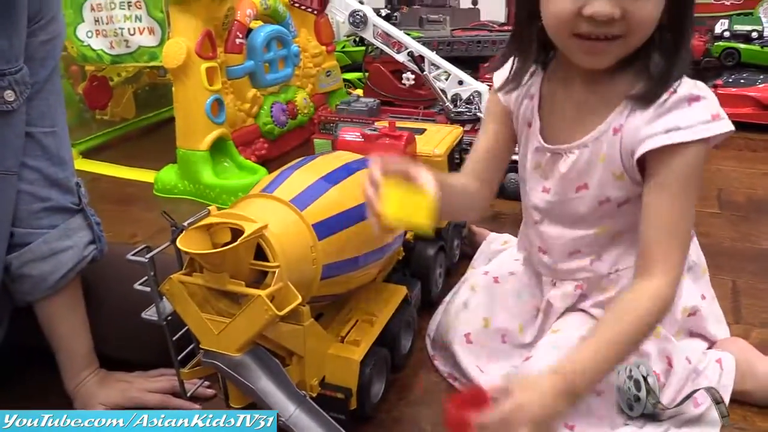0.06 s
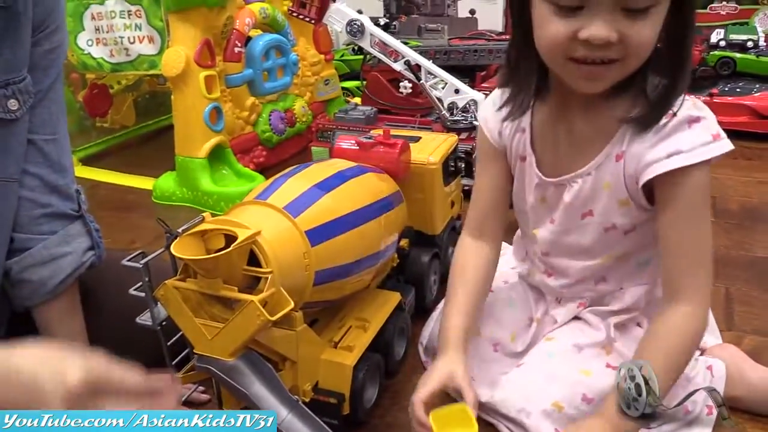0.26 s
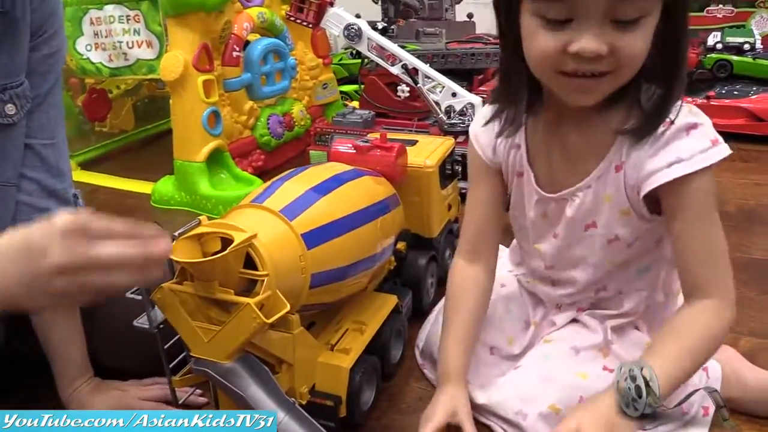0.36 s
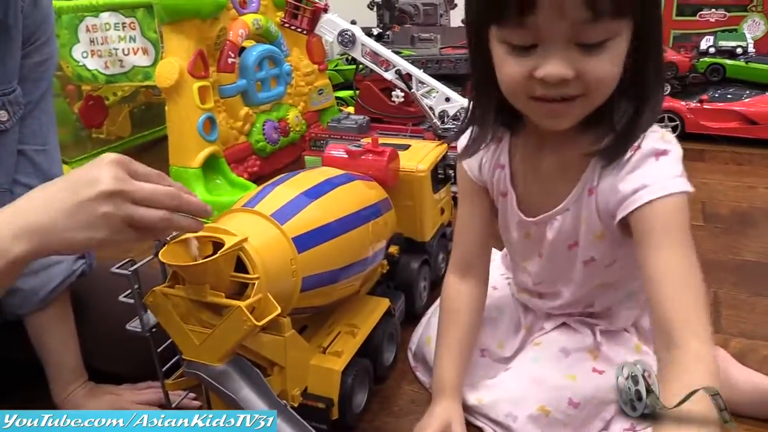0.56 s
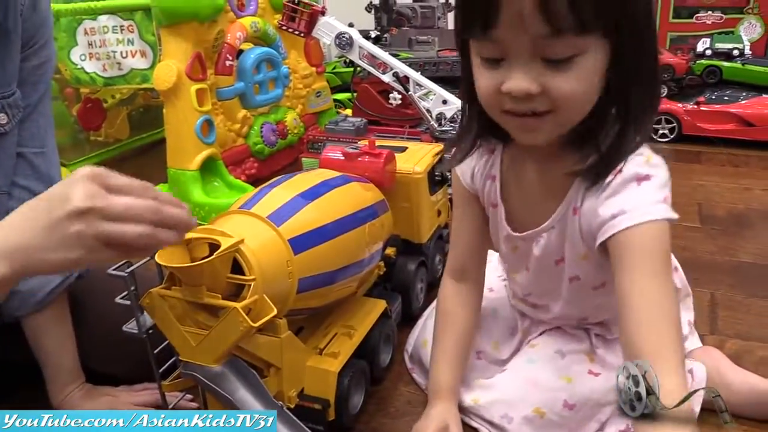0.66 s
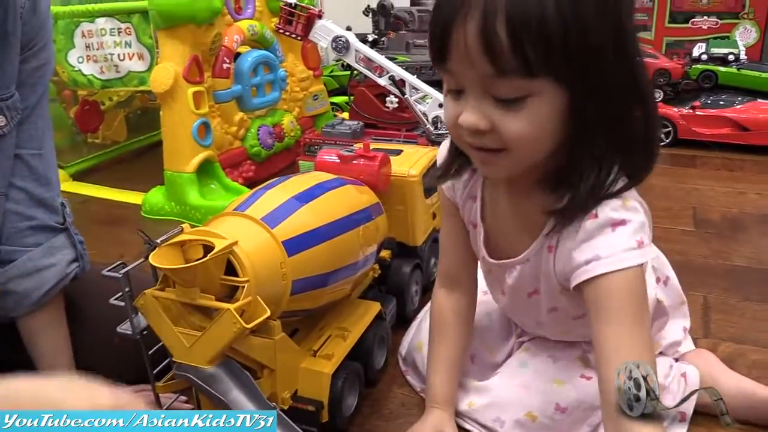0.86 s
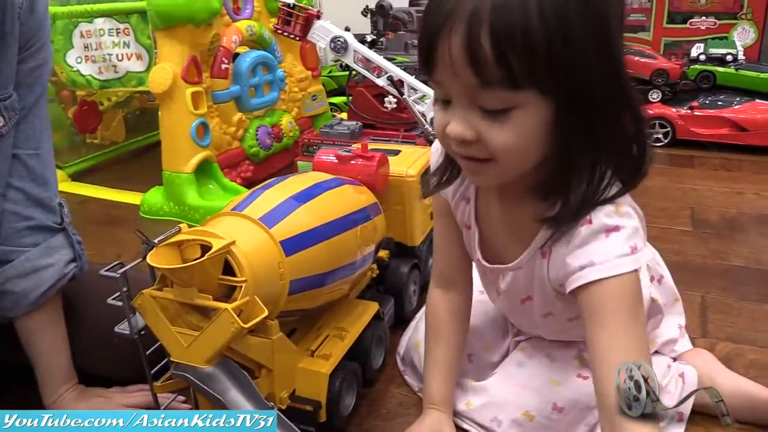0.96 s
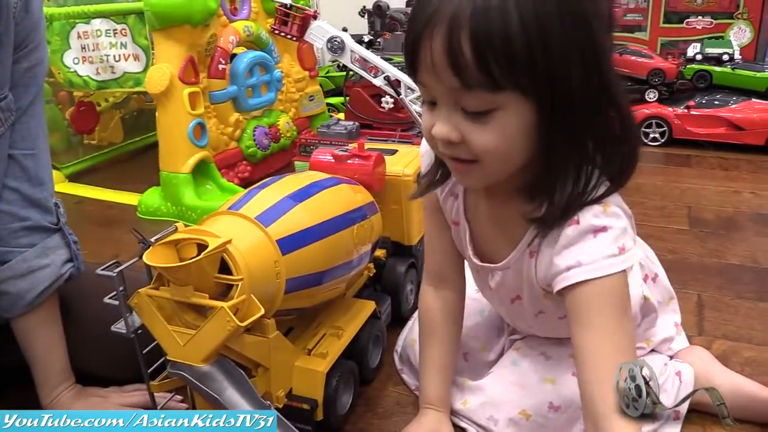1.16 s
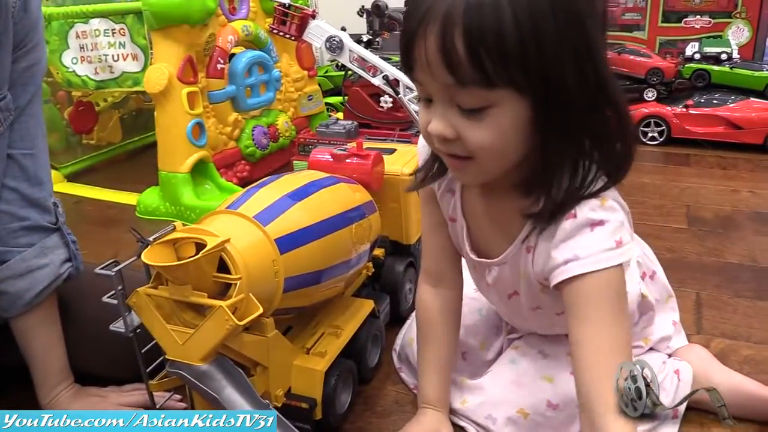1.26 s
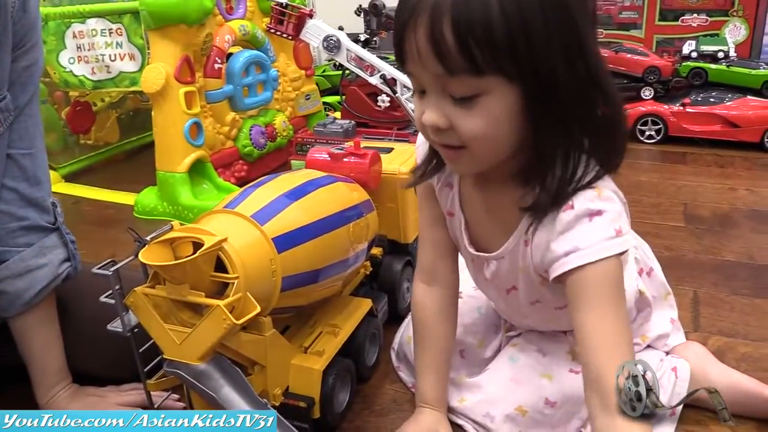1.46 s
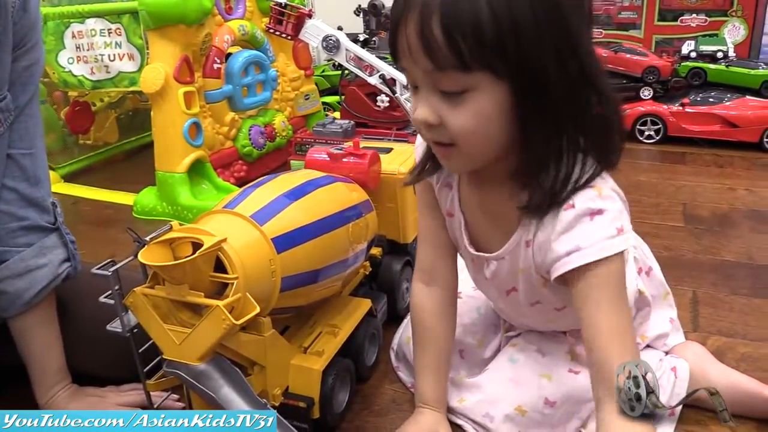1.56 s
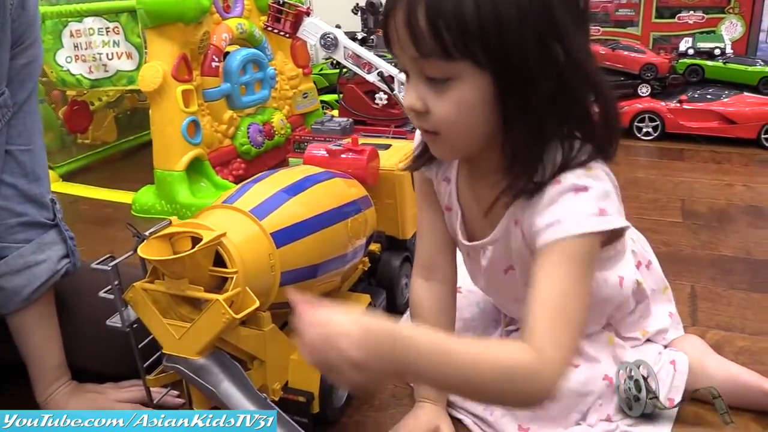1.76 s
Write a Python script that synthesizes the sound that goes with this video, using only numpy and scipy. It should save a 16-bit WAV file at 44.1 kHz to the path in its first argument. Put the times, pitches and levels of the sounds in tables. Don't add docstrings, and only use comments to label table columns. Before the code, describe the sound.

Hard plastic toy clatter in a bare, live room. An earlier knock's tail fades, then a cup cracks onto wood at 0.23 s, rocks rapidly and bounces at 0.46. Pellets tick from 0.67, hollow drum knocks follow at 0.8-0.95, and bright rattling runs down a chute at 1.0-1.3. A part lands at 1.4, wobbles, settles at 1.57; faint ticks near 1.73. Low hush, squashed peaks.

```python
import sys
import numpy as np
from scipy import signal
from scipy.fft import rfft, irfft
from scipy.io import wavfile

SR = 44100
rng = np.random.default_rng(int(sys.argv[2]) if len(sys.argv) > 2 else 0)


def generate_wav(sig):
    pcm = np.round(np.clip(np.atleast_2d(sig).T, -1, 1) * 32767).astype(np.int16)
    wavfile.write(sys.argv[1], SR, pcm)


def gain_from_decibels(decibels):
    exponent = np.asarray(decibels, float) / 20
    return 10 ** exponent


N = 79380

# (time [s], peak level [dB], own ring [Hz], room send [dB])
EARLIER_KNOCKS = [
    (-0.21, -6, 2290, 2),
]
# (time [s], peak level [dB], own ring [Hz], room send [dB])
CUP_DROP_KNOCKS = [
    (.2273, 3, 2130, 6),
    (.2353, 6.2, 3680, -4.5),
]
# (time [s], peak level [dB], own ring [Hz], room send [dB])
CUP_ROCKING_KNOCKS = [
    (.262, -5, 2030, 4),
    (.293, 3, 2040, -3.5),
    (.314, -1, 2080, -15),
    (.3255, -2, 1970, 1),
    (.338, -10, 2220, 6),
    (.357, -3, 2080, -2.5),
    (.368, -14, 2500, -2),
]
# (time [s], peak level [dB], own ring [Hz], room send [dB])
CUP_BOUNCE_KNOCKS = [
    (0.4549, 0, 2360, 0.77),
    (0.4584, -7.5, 2200, 0.65),
]
# (time [s], peak level [dB], own ring [Hz], room send [dB])
PELLET_KNOCKS = [
    (.6653, 1, 7400, 2.5),
    (.6782, 0, 7570, -3.5),
    (.6995, -11, 8030, 10.5),
    (.7057, -6, 7700, -12),
    (.7235, -25, 7700, -6),
    (1.0605, -12.5, 9530, -4),
]
# (time [s], peak level [dB], own ring [Hz], room send [dB])
DEEP_PELLET_KNOCKS = [
    (.7057, -6, 3240, 0),
    (.7272, 3, 2900, -8),
    (.7335, -1.5, 2780, -16),
]
# (time [s], peak level [dB], own ring [Hz], room send [dB])
DRUM_KNOCKS = [
    (.8025, 2.5, 3400, 1.5),
    (.8199, -4, 1920, 4),
    (.8572, 4, 2200, 0),
    (.8788, -9, 2300, -41),
    (.8905, -0.5, 2470, 0),
    (.9285, 4, 2900, -6),
]
# (time [s], peak level [dB], own ring [Hz], room send [dB])
TUMBLE_KNOCKS = [
    (.8045, -6.5, 3700, -8),
    (.8225, -1, 3230, -10),
    (.8545, -21, 2900, -19),
    (.876, -7.5, 2500, -5),
    (.8825, -11, 3400, -16),
    (.9245, -23, 2500, -12),
    (.949, -15, 2250, 0),
]
# (time [s], peak level [dB], own ring [Hz], room send [dB])
RATTLE_KNOCKS = [(.8235, -19, 6300, -4), (.859, -26, 7140, -1), (.881, -16.5, 6100, 8),
                 (.921, -18, 6100, 4), (.931, -21, 6200, 6.5), (1.063, -15, 6500, 6),
                 (1.076, -24, 8700, -8), (1.092, -12, 4800, 3.5), (1.112, -13.5, 6370, -3),
                 (1.1225, -14, 7000, -3), (1.138, -15, 8400, -4), (1.153, -14, 6600, -2),
                 (1.176, -14.5, 7900, -3.5), (1.190, -14, 8350, -12), (1.234, -18.5, 5600, -3),
                 (1.288, -23, 8700, -3)]
# (time [s], peak level [dB], own ring [Hz], room send [dB])
CHUTE_KNOCKS = [
    (1.0145, -10, 2650, 7),
    (1.0748, -2, 1850, 0),
    (1.0913, 0.5, 2800, 2),
    (1.109, -11, 3160, -1),
    (1.1215, 4, 2630, -27),
    (1.138, -12, 2230, 7.5),
    (1.1525, -13.5, 2900, 8),
    (1.1885, -6.5, 2900, -6),
    (1.2315, -5.5, 2710, -0.5),
    (1.287, -12, 2760, 2.5),
]
# (time [s], peak level [dB], own ring [Hz], room send [dB])
SET_DOWN_KNOCKS = [
    (1.3995, -1.5, 2093, -3),
    (1.4065, -6.5, 3050, -2),
]
# (time [s], peak level [dB], own ring [Hz], room send [dB])
WOBBLE_KNOCKS = [
    (1.4125, -12, 2700, 0.5),
    (1.421, -14, 3050, -3),
    (1.4432, -15.5, 2160, -2),
    (1.468, -17, 3050, -3),
    (1.515, -20.5, 2170, 1.5),
    (1.5345, -31, 2150, -1),
]
# (time [s], peak level [dB], own ring [Hz], room send [dB])
SETTLE_KNOCKS = [
    (1.5727, -15.5, 1810, -1.9),
]
# (time [s], peak level [dB], own ring [Hz], room send [dB])
LAST_TICK_KNOCKS = [
    (1.7206, -21, 2900, 0),
    (1.7381, -20, 2800, -29),
]
# (time [s], peak level [dB], board ring [Hz])
BOARD_THUMPS = [
    (.228, -13, 254),
    (0.457, -17.5, 221),
    (0.803, -25.5, 308),
    (1.02, -31.5, 246),
    (1.301, -35, 310),
    (1.391, -19, 280),
    (1.407, -21, 137),
    (1.575, -25.5, 216),
]

# (frequency [Hz], level [dB])
EARLIER_COLOUR = [(150, -10), (400, -11), (1900, -14), (4000, -13), (12000, -34), (16400, -74)]
# (frequency [Hz], level [dB])
CUP_COLOUR = [(70, -28.5), (150, -15.5), (700, -16.5), (1500, -10.5), (2200, -6), (3300, -10.5),
              (4700, -25.5), (7600, -23.5), (12500, -46), (16400, -100)]
# (frequency [Hz], level [dB])
BOUNCE_COLOUR = [(59, -81), (100, -34), (424, -24), (1650, -21), (2170, -14), (9210, -48.5), (13500, -44),
                 (16000, -101)]
# (frequency [Hz], level [dB])
PELLET_COLOUR = [(240, -56), (400, -24), (897, -9.5), (1700, -7.5), (2540, -4), (3860, -15.5), (7640, -4.5),
                 (13000, -22.5), (16400, -33)]
# (frequency [Hz], level [dB])
DEEP_PELLET_COLOUR = [(500, -43), (1000, -19), (1600, -14.5), (2900, -1.5), (4000, -20), (8500, -26),
                      (16000, -55)]
# (frequency [Hz], level [dB])
DRUM_COLOUR = [(150, -57), (504, -31), (637, -25), (854, -13.5), (1660, -11.5), (2180, 0), (4500, -16.5),
               (8560, -23), (16000, -37)]
# (frequency [Hz], level [dB])
RATTLE_COLOUR = [(2500, -46), (4500, -5), (7000, 3.5), (10000, -6.5), (13000, -26), (16400, -38)]
# (frequency [Hz], level [dB])
CHUTE_COLOUR = [(180, -64), (300, -40), (379, -37.5), (856, -17), (2790, -6.5), (4090, -18), (8500, -30.5),
                (16000, -63)]
# (frequency [Hz], level [dB])
SET_DOWN_COLOUR = [(80, -16), (1550, -5.5), (1760, -4), (2220, -3.5), (2580, -8.5), (3300, -9), (4500, -24),
                   (16000, -68)]
# (frequency [Hz], level [dB])
SETTLE_COLOUR = [(300, -21.5), (800, -1.5), (2000, -7.5), (3200, -11), (4500, -26), (16000, -90)]
# (frequency [Hz], level [dB])
LAST_TICK_COLOUR = [(710, -58), (1200, -22), (2860, -9.5), (4080, -28.5), (8910, -26.5), (16000, -87)]

# (frequency [Hz], level [dB], T60 [s])
CUP_RINGS = [(823, -11, 0.02), (2080, -13, 0.05), (2390, -5, 0.032), (3700, -4, 0.076), (5140, -30, 0.03),
             (7100, -15, .02)]
# (frequency [Hz], level [dB], T60 [s])
ROCKING_RINGS = [(2080, 1.5, 0.027), (2410, -11, 0.018), (2550, -23, .03), (5400, -7.5, 0.031),
                 (7400, -7, .015)]
# (frequency [Hz], level [dB], T60 [s])
BOUNCE_RINGS = [(1090, -19.5, 0.039), (2114, 8, 0.017), (2700, -1.5, 0.035), (8950, -49, 0.0055)]
# (frequency [Hz], level [dB], T60 [s])
PELLET_RINGS = [(993, -5.5, 0.084), (2650, -7, .03), (8000, -3, 0.0058), (9400, -32, 0.014)]
# (frequency [Hz], level [dB], T60 [s])
DEEP_PELLET_RINGS = [(975, -9, 0.04), (1640, -10, 0.0395), (2650, -20, .03), (3220, -20, 0.04)]
# (frequency [Hz], level [dB], T60 [s])
DRUM_RINGS = [(810, -24, 0.048), (880, -7, 0.04), (1920, -15, 0.12), (2160, -6.5, 0.087),
              (2950, 7.5, 0.017), (3400, -32, 0.027)]
# (frequency [Hz], level [dB], T60 [s])
TUMBLE_RINGS = [(848.5, 3.5, 0.061), (3400, -14, .02), (2500, -9, 0.016)]
# (frequency [Hz], level [dB], T60 [s])
RATTLE_RINGS = [(6560, -18, .01), (8700, -2, 0.014)]
# (frequency [Hz], level [dB], T60 [s])
CHUTE_RINGS = [(1710, -49, 0.036), (1850, 4.5, 0.026), (2360, -7, 0.075), (2820, -29, 0.046),
               (4830, -42, 0.015), (8450, -7, 0.034)]
# (frequency [Hz], level [dB], T60 [s])
SET_DOWN_RINGS = [(1640, -14, 0.056), (2150, -1, 0.025), (3050, 2, 0.052), (3280, -12, 0.034)]
# (frequency [Hz], level [dB], T60 [s])
WOBBLE_RINGS = [(1530, -12, 0.023), (2710, -14, 0.031), (3050, -8, 0.034), (3520, -4, 0.042)]
# (frequency [Hz], level [dB], T60 [s])
SETTLE_RINGS = [(890, -9, 0.032)]
# (frequency [Hz], level [dB], T60 [s])
LAST_TICK_RINGS = [(1560, -25, 0.067), (2800, -56, 0.027), (2900, 3, .03), (3150, 22, 0.031)]

# (frequency [Hz], T60 [s])
ROOM_DECAY = [(100, 0.21), (500, 0.46), (2000, 0.58), (5000, 0.54), (12000, 0.32)]
# (frequency [Hz], likeness [0-1])
STEREO_LIKENESS = [(100, 1), (500, 0.48), (2000, 0.59), (5000, 0.051), (12000, 0.37)]
# (frequency [Hz], level [dB])
HUSH_COLOUR = [(25, -40), (110, -1.5), (500, -3), (1200, -5.5), (5000, -24), (12000, -36), (16000, -52)]

LEAD = SR // 2
CONTACTS_PER_S, FIRST_CONTACT, CHATTER_S, FADE_S = 5000, 0.6, 0.0034, 0.0025
SCATTER_DB, DETUNE = 4, 0.02
RING_T60_S, CRACK_DB = 0.021, 19
ROOM_DELAY_S, ROOM_RISE_S, ROOM_DB = 0.006, 0.0066, 2
DROP_DELAY_S = 0.016
THUMP_T60_S, THUMP_SEND_DB = 0.042, -8.5
HUSH_DB, WHINE_HZ, WHINE_T60_S, WHINE_DB = -46.5, 1869, 0.054, -50
LIMIT_DB, LIMIT_SHARE, RELEASE_DB_PER_S, ATTACK_S = -2, 0.91, 282, 0.0028
LOW_CUT_HZ, HIGH_CUT_HZ = 70, 16600


def contact_chatter(size):
    t = np.arange(size) / SR
    touches = rng.random(size) < CONTACTS_PER_S / SR
    strength = rng.uniform(-1, 1, size)
    chatter = touches * strength * np.exp(-np.maximum(t - CHATTER_S, 0) / FADE_S)
    chatter[0] = FIRST_CONTACT
    return chatter


def struck_body(colour, modes, modes_db, own_hz, size):
    click = np.full(size, 1e-18)
    click[0] = 1
    body = np.zeros(size)
    for hz, db, t60 in modes:
        mode_db = db + modes_db - 2 * SCATTER_DB * rng.random()
        mode_hz = hz * (1 + DETUNE * (rng.random() - 0.5))
        body += gain_from_decibels(mode_db) * ring(click, mode_hz, t60)
    body += ring(click, own_hz, RING_T60_S)
    body[:len(colour)] += gain_from_decibels(CRACK_DB) * colour
    return body


def plastic_part(knocks, tone, modes, drive_db, modes_db, pan_db, delay_s=ROOM_DELAY_S):
    close, send = np.zeros(N + SR), np.zeros(N + SR)
    size, onset = SR // 8, SR // 160
    colour = causal(tone)
    for time_s, db, own_hz, send_db in knocks:
        body = struck_body(colour, modes, modes_db, own_hz, size)
        knock = signal.fftconvolve(contact_chatter(size), body)[:size]
        start = LEAD + int(time_s * SR)
        level_db = db + drive_db
        close[start:start + size] += gain_from_decibels(level_db - 8) * knock / knock[:onset].std()
        send[start:start + size] += gain_from_decibels(level_db + send_db - 8.5) * body / body[:onset].std()
    pan = gain_from_decibels(np.array([[0.5], [-0.5]]) * pan_db)
    return ((close + room(send, delay_s)) * pan)[:, LEAD:LEAD + N]


def floorboards():
    boards = np.zeros(N)
    push = np.hanning(60)
    push /= push.sum()
    for time_s, db, hz in BOARD_THUMPS:
        force = np.full(N, 1e-18)
        start = int(time_s * SR)
        force[start:start + len(push)] = push
        boards += gain_from_decibels(db) * ring(force, hz, THUMP_T60_S)
    return boards + gain_from_decibels(THUMP_SEND_DB) * room(boards)


def room(x, delay_s=ROOM_DELAY_S):
    hz, s, bins = signal.stft(stereo_noise(SR), SR, nperseg=256)
    decay = gain_from_decibels(-60 * s / at_hz(ROOM_DECAY, hz)[:, None])
    tail = signal.istft(bins * decay, SR, nperseg=256)[1][:, :SR]
    since_delay = np.maximum(np.arange(SR) / SR - delay_s, 0)
    tail = tail * (1 - np.exp(-since_delay / ROOM_RISE_S))
    tail /= np.sqrt(np.mean(np.sum(tail ** 2, axis=1)))
    return gain_from_decibels(ROOM_DB) * signal.fftconvolve(x[None], tail, axes=1)[:, :len(x)]


def hush():
    whine = ring(rng.standard_normal(N), WHINE_HZ, WHINE_T60_S)
    noise = signal.fftconvolve(stereo_noise(N), causal(HUSH_COLOUR)[None], axes=1)[:, :N]
    return gain_from_decibels(WHINE_DB) * whine / whine.std() + gain_from_decibels(HUSH_DB) * noise


def stereo_noise(size):
    mid, side = rfft(rng.standard_normal((2, size)))
    alike = np.clip(at_hz(STEREO_LIKENESS, np.fft.rfftfreq(size, 1 / SR)), 0, 1)
    mid = np.sqrt(1 + alike) * mid
    side = np.sqrt(1 - alike) * side
    return irfft((mid + side * [[1], [-1]]) / np.sqrt(2), size)


def ring(x, hz, t60):
    r, w = gain_from_decibels(-60 / (t60 * SR)), 2 * np.pi * hz / SR
    return signal.lfilter([0.5, 0, -0.5], [1, -2 * r * np.cos(w), r * r], x)


def causal(tone, size=4096):
    log_gain = np.log(gain_from_decibels(at_hz(tone, np.fft.rfftfreq(size, 1 / SR))))
    cepstrum = irfft(log_gain)
    cepstrum[1:size // 2] *= 2
    cepstrum[size // 2 + 1:] = 0
    h = irfft(np.exp(rfft(cepstrum)))[:size // 2]
    return h / np.sqrt(np.sum(h ** 2))


def at_hz(points, hz):
    table_hz, value = np.array(points).T
    return np.interp(np.log(hz + 1e-3), np.log(table_hz), value)


def scene():
    mix = plastic_part(EARLIER_KNOCKS, EARLIER_COLOUR, SET_DOWN_RINGS, -2.1, -5, pan_db=-0.5)
    mix += plastic_part(CUP_DROP_KNOCKS, CUP_COLOUR, CUP_RINGS, -0.17, -1.9, pan_db=2.0,
                        delay_s=DROP_DELAY_S)
    mix += plastic_part(CUP_ROCKING_KNOCKS, CUP_COLOUR, ROCKING_RINGS, -4, 4.4, pan_db=-4.0)
    mix += plastic_part(CUP_BOUNCE_KNOCKS, BOUNCE_COLOUR, BOUNCE_RINGS, -1.2, -1.6, pan_db=-0.8)
    mix += plastic_part(PELLET_KNOCKS, PELLET_COLOUR, PELLET_RINGS, -6.0, -5.5, pan_db=2.5)
    mix += plastic_part(DEEP_PELLET_KNOCKS, DEEP_PELLET_COLOUR, DEEP_PELLET_RINGS, -2.1, -6, pan_db=0.5)
    mix += plastic_part(DRUM_KNOCKS, DRUM_COLOUR, DRUM_RINGS, -5.0, -5.5, pan_db=-0.2)
    mix += plastic_part(TUMBLE_KNOCKS, DRUM_COLOUR, TUMBLE_RINGS, -3.5, 3.3, pan_db=2.3)
    mix += plastic_part(RATTLE_KNOCKS, RATTLE_COLOUR, RATTLE_RINGS, -5, 2, pan_db=-0.3)
    mix += plastic_part(CHUTE_KNOCKS, CHUTE_COLOUR, CHUTE_RINGS, -3.9, -15.0, pan_db=-1.0)
    mix += plastic_part(SET_DOWN_KNOCKS, SET_DOWN_COLOUR, SET_DOWN_RINGS, -3.5, -5, pan_db=-5.0)
    mix += plastic_part(WOBBLE_KNOCKS, SET_DOWN_COLOUR, WOBBLE_RINGS, -6, 0.44, pan_db=8.5)
    mix += plastic_part(SETTLE_KNOCKS, SETTLE_COLOUR, SETTLE_RINGS, -1.3, -8.0, pan_db=0.0)
    mix += plastic_part(LAST_TICK_KNOCKS, LAST_TICK_COLOUR, LAST_TICK_RINGS, -1.3, -26, pan_db=1.0)
    return mix + floorboards() + hush()


def top_cut(x):
    return signal.sosfilt(signal.butter(12, 16510, fs=SR, output="sos"), x)


def record(dry):
    slope = RELEASE_DB_PER_S * np.arange(N) / SR
    peak_db = 20 * np.log10(np.abs(dry).max(axis=0) + 1e-6)
    held_db = np.maximum.accumulate(peak_db + slope) - slope
    over_db = LIMIT_SHARE * np.maximum(held_db - LIMIT_DB, 0)
    r = np.exp(-1 / (ATTACK_S * SR))
    cut_db = signal.lfilter([1 - r], [1, -r], over_db)
    limited = np.tanh(dry * gain_from_decibels(-cut_db))
    low_cut = signal.butter(1, LOW_CUT_HZ, "high", fs=SR, output="sos")
    high_cut = signal.cheby2(10, 60, HIGH_CUT_HZ, fs=SR, output="sos")
    mix = signal.sosfilt(high_cut, signal.sosfilt(low_cut, limited))
    return top_cut(mix)


dry = scene()
out = record(dry)
generate_wav(out)
```